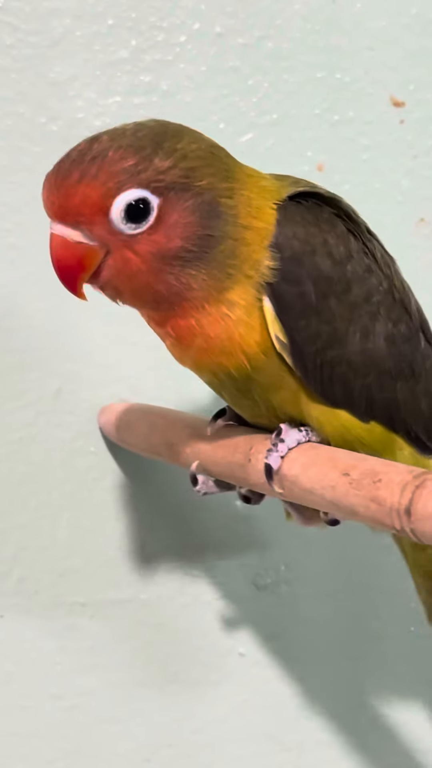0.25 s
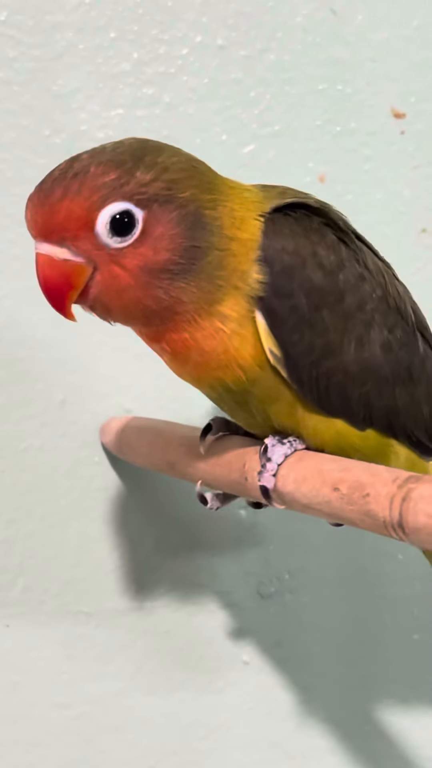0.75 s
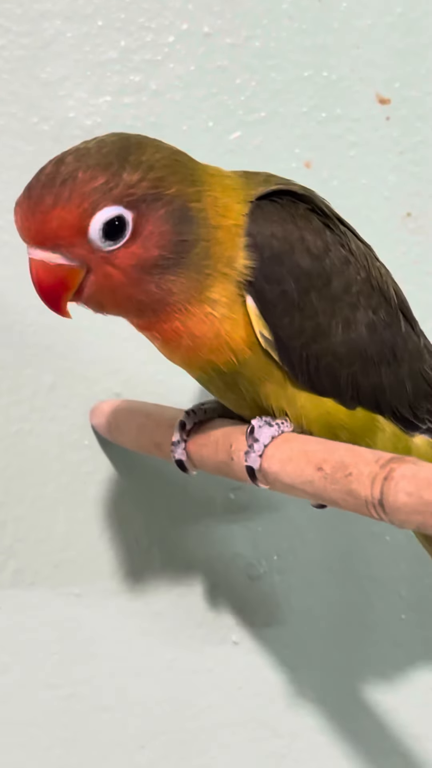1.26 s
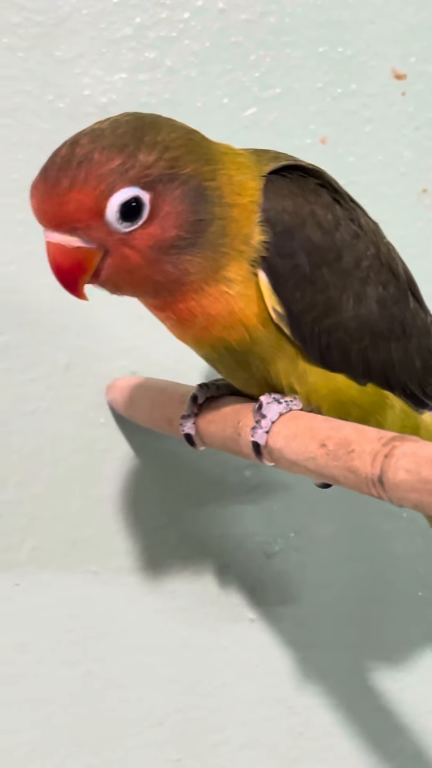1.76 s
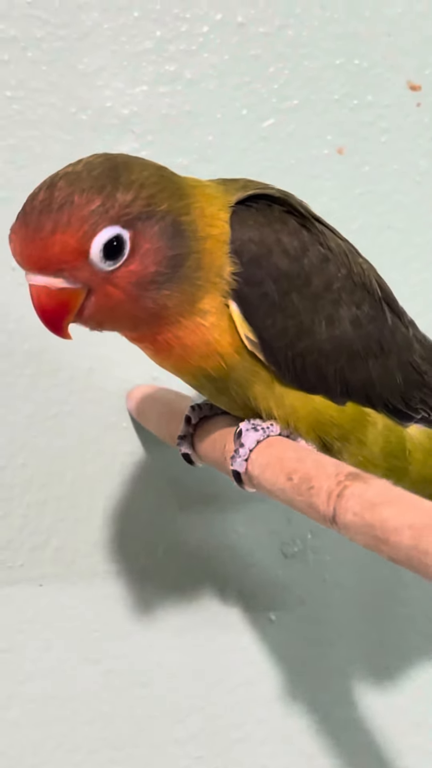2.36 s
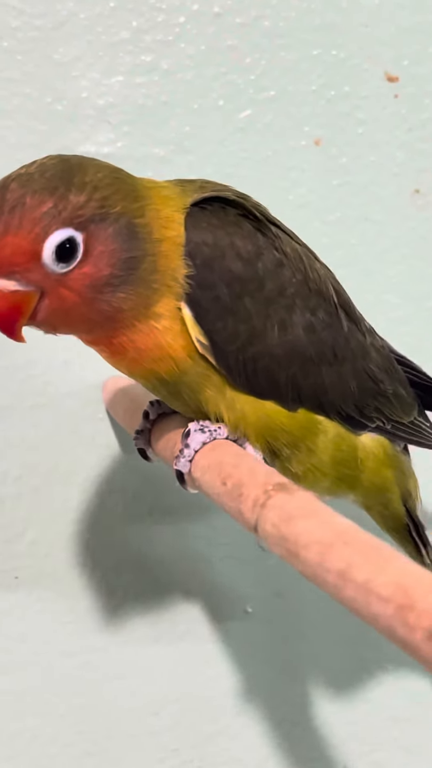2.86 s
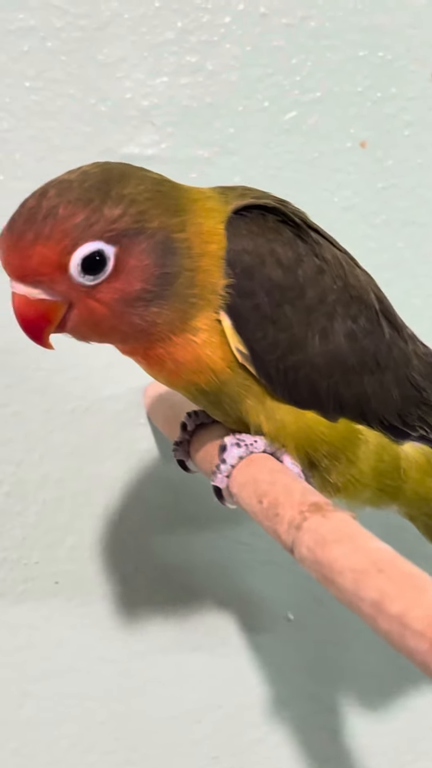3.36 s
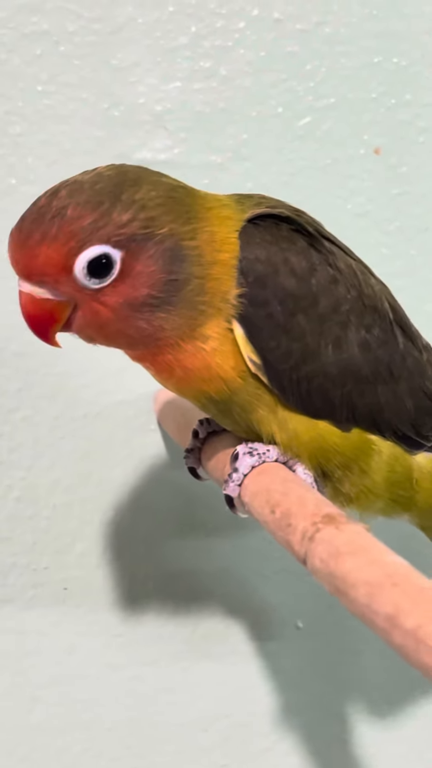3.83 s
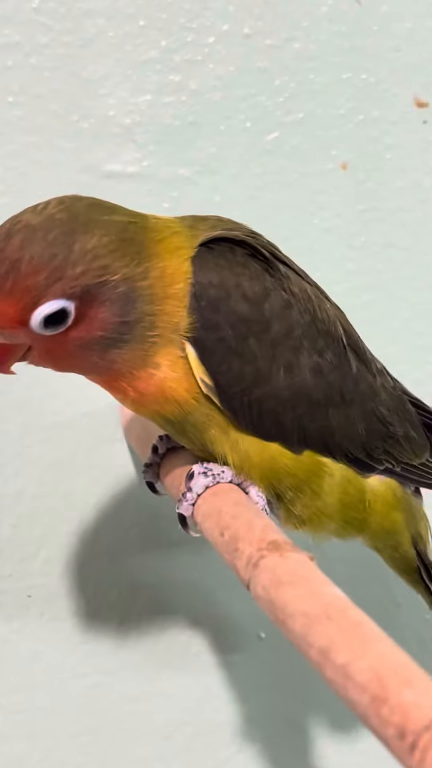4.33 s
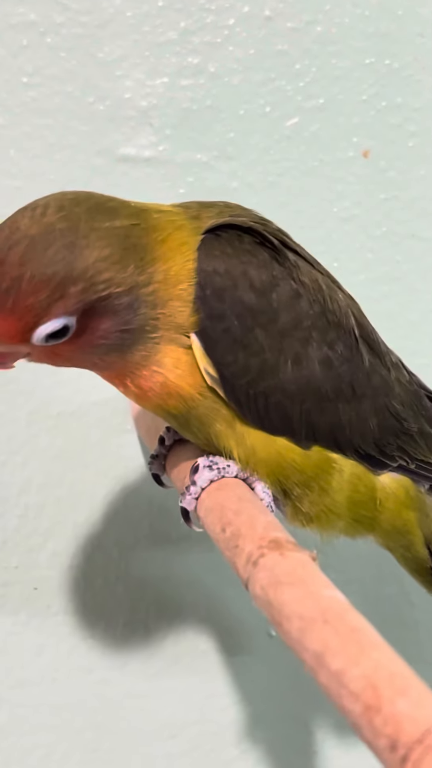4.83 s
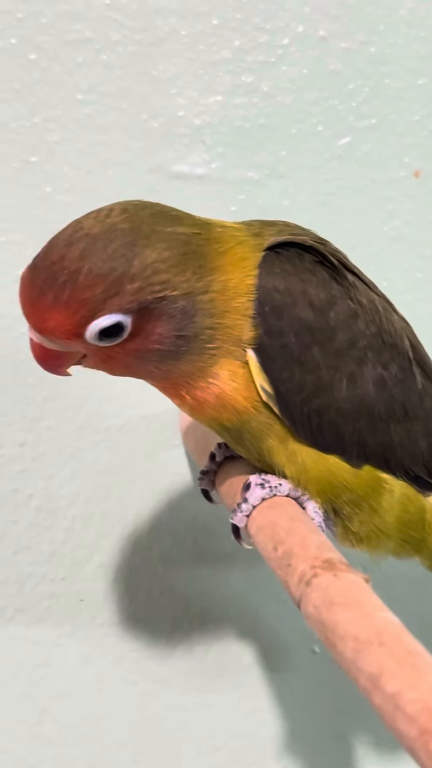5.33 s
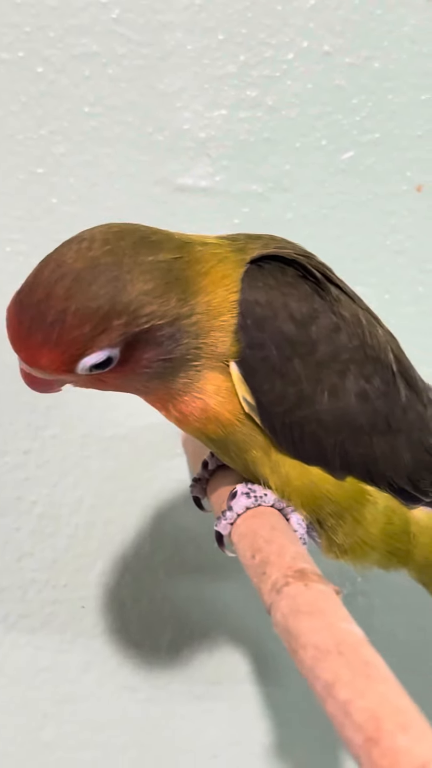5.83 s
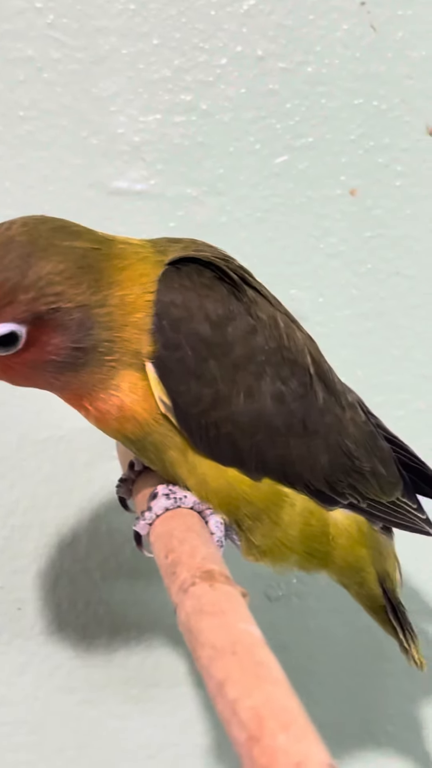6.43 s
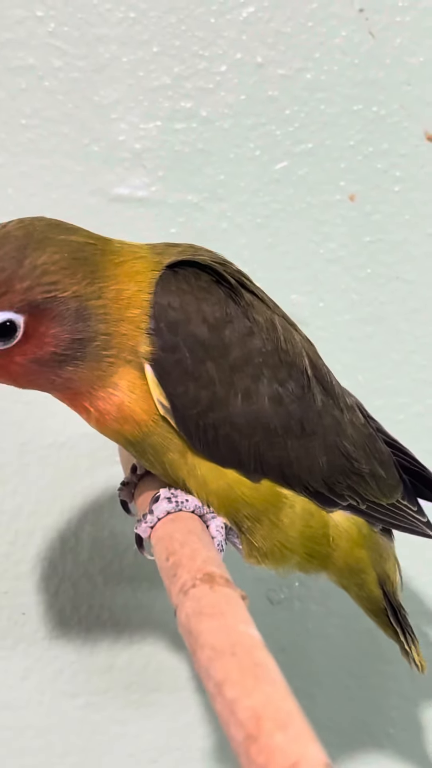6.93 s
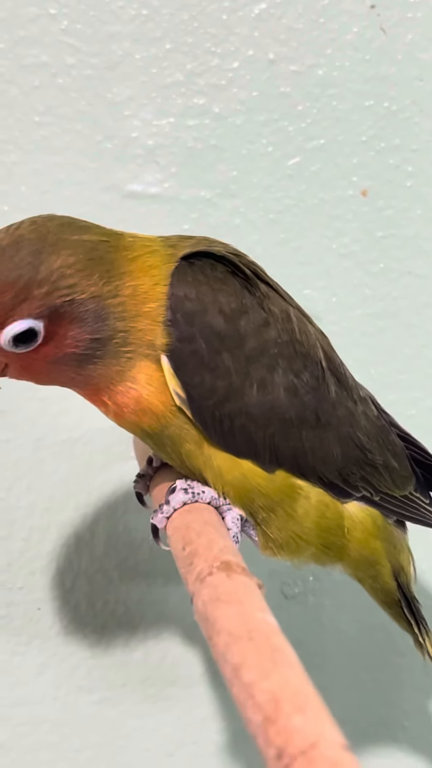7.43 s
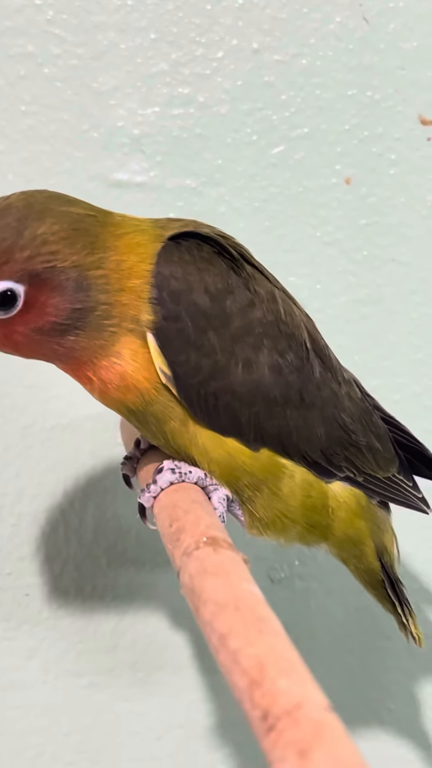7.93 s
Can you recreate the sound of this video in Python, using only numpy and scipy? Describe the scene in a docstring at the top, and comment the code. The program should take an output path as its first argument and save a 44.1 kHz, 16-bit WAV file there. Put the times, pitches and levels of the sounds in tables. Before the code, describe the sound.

A small parrot gives short, sharp, high chirps and scratchy chips close by in a bare, echoing room, with very faint street rumble behind.

```python
"""A small parrot calls close by in a bare, hard-walled room, heard in stereo.
Rough chips: a falling low buzz, a break and a whistle near 6 kHz. Clearer chirps: scrape, rising sweep, whistle.
Each note is a gliding sum of partials; roughness shakes pitch and level and adds air noise.
Behind: street rumble and wash, flickering treble hiss (shaped noise), a far engine that climbs in pitch
(two unsteady sines), a faint hum that stops early (sine over drone), dull taps and one slow, broad wash
of noise at 2.5 s, each a dying noise band."""
import sys
import numpy as np
from scipy import signal
from scipy.fft import rfft, irfft
from scipy.io import wavfile

SR = 44100
rng = np.random.default_rng(int(sys.argv[2]) if len(sys.argv) > 2 else 0)


def dump(signal):
    """Clip the signal to [-1, 1] and save it as 16-bit WAV at the path in sys.argv[1]."""
    limited = np.clip(np.atleast_2d(signal).T, -1, 1)
    pcm = np.round(limited * 32767).astype(np.int16)
    wavfile.write(sys.argv[1], SR, pcm)


N = 360738
HZ = np.fft.rfftfreq(N, 1 / SR)


def from_db(db):
    """dB to gain."""
    return 10 ** (np.asarray(db) / 20)


def rms_one(x):
    """Scale to rms 1."""
    return x / np.sqrt(np.mean(x ** 2) + 1e-20)


def in_time(rows):
    """Interpolate each column of a time table at every sample."""
    time_s, *columns = np.transpose(rows)
    return [np.interp(np.arange(N) / SR, time_s, column) for column in columns]


def colour(x, spectrum):
    """Filter by (freq_hz, gain_db) points on a log-frequency axis."""
    freq_hz, gain_db = np.transpose(spectrum)
    curve_db = np.interp(np.log(HZ + 1), np.log(freq_hz), gain_db)
    return irfft(rfft(x) * from_db(curve_db), N)


def wobble(rate_hz):
    """Random drift of rms 1: white noise through a two-pole low-pass."""
    pole = np.exp(-2 * np.pi * rate_hz / SR)
    white = rng.standard_normal(N + SR)
    settled = signal.lfilter([1], [1, -2 * pole, pole * pole], white)[SR:]
    return rms_one(settled)


def noise(spectrum, patchy_db):
    """Coloured noise of rms 1 with a slowly flickering level."""
    coloured = colour(rng.standard_normal(N), spectrum)
    return rms_one(coloured * from_db(patchy_db * wobble(7.7)))


def band_noise(white, edges_hz):
    """Band-passed noise."""
    return signal.sosfilt(signal.butter(2, edges_hz, "band", fs=SR, output="sos"), white)


# low street noise: freq_hz, relative_density_db
RUMBLE_SPECTRUM = [(12, -48.5), (20, -29.5), (59, -4.5), (108, 0.5), (141, -14), (171, -4.5), (203, -33.5),
                   (230, -23), (300, -56.5), (510, -120)]
# its level: time_s, level_db
RUMBLE_LEVEL = [(0, -65), (.45, -66.5), (.8, -61), (1.25, -59.5), (1.6, -67.5), (2.0, -64), (3.0, -61),
                (3.7, -68), (4.3, -60.5), (4.8, -66), (5.8, -63), (6.4, -63), (7.0, -66), (7.8, -63),
                (8.18, -69.5)]
# mid street noise: freq_hz, relative_density_db
WASH_SPECTRUM = [(120, -25), (200, -6), (329, -16.5), (461, -13.5), (564, -20.5), (929, -11.5), (1610, -24),
                 (3430, -42), (5000, -39.5), (6500, -75), (11000, -120)]
# its level: time_s, level_db
WASH_LEVEL = [(0.0, -79), (1.23, -73), (1.48, -82), (2.8, -70.5), (3.8, -87.5), (4.6, -82), (4.74, -75.5),
              (5.49, -79.5), (6.49, -75), (7.34, -82), (7.61, -75), (8.18, -81)]


def street():
    """Low rumble plus mid wash: shaped noise on drifting levels."""
    (rumble_db,), (wash_db,) = in_time(RUMBLE_LEVEL), in_time(WASH_LEVEL)
    rumble = from_db(rumble_db) * noise(RUMBLE_SPECTRUM, patchy_db=1.5)
    wash = from_db(wash_db) * noise(WASH_SPECTRUM, patchy_db=3.)
    return rumble + wash


# noise that differs between left and right: freq_hz, relative_density_db
OWN_SPECTRUM = [(150, -42), (300, -6.5), (700, -5.5), (1400, -18.5), (3400, -27), (5000, -46)]
OWN_RE_WASH_DB = -1.5


def own_noise():
    """Independent noise at left and right; its level follows the wash."""
    (wash_db,) = in_time(WASH_LEVEL)
    pair = np.array([noise(OWN_SPECTRUM, patchy_db=9.0) for side in "LR"])
    return from_db(wash_db + OWN_RE_WASH_DB) * pair


# treble hiss: freq_hz, relative_density_db
HISS_SPECTRUM = [(1500, -19.5), (3000, -5), (5000, -10.5), (8000, -6), (10500, -7), (11300, -2),
                 (12000, -8.5), (15000, -16)]
# its level: time_s, level_db
HISS_LEVEL = [(0, -80), (1.2, -78.5), (1.8, -89), (4.5, -91.5), (5.1, -72.5), (6.3, -73.5), (6.7, -97),
              (7.25, -72.5), (7.5, -84.5), (8.18, -83)]


def hiss():
    """Thin treble noise that comes and goes."""
    (level_db,) = in_time(HISS_LEVEL)
    return from_db(level_db) * noise(HISS_SPECTRUM, patchy_db=2.0)


# far engine: time_s, firing_hz, level_db (mean, about which the level wobbles)
ENGINE_RUN = [(1.6, 117, -89), (1.78, 124.7, -57), (2.05, 130, -64), (2.5, 135, -64), (2.7, 150, -66.5),
              (3.22, 149.7, -56.5), (3.4, 155.7, -72.5), (3.48, 163, -60), (3.78, 163.4, -59.5),
              (4.1, 158.5, -79)]
HALF_DB, HALF_MIDDLE_S, HALF_WIDTH_S = -57, 2.9, .2   # half-rate swell: peak, middle, half width at 1/e


def engine():
    """Firing tone of unsteady pitch and level, plus a half-rate tone that swells once."""
    firing_hz, level_db = in_time(ENGINE_RUN)
    t = np.arange(N) / SR
    start_s, end_s = ENGINE_RUN[0][0], ENGINE_RUN[-1][0]
    fade = np.clip(np.minimum(t - start_s, end_s - t) / .15, 0, 1)
    phase = 2 * np.pi * np.cumsum(firing_hz * (1 + 0.0021 * wobble(19))) / SR
    firing = from_db(level_db + 5.8 * wobble(9)) * np.sin(phase)
    swell = np.exp(-((t - HALF_MIDDLE_S) / HALF_WIDTH_S) ** 2)
    half = from_db(HALF_DB) * swell * np.sin(phase / 2)
    return np.sqrt(2) * fade * (firing + half)   # sqrt(2): levels are rms


# appliance drone: freq_hz, relative_density_db
DRONE_SPECTRUM = [(150, -30.5), (210, 2.5), (300, 1.5), (400, -29.5)]
DRONE_DB = -76.5
HUM_HZ, HUM_WOBBLE_HZ, HUM_DB = 466, 17, -78   # HUM_DB: sine peak at wobble 1
HUM_END_S = 3.3


def hum():
    """Some appliance that switches off: a sine of random amplitude over a low noise drone."""
    t = np.arange(N) / SR
    on = np.clip((HUM_END_S - t) / .05, 0, 1)
    tone = from_db(HUM_DB) * wobble(HUM_WOBBLE_HZ) * np.sin(2 * np.pi * HUM_HZ * t)
    drone = from_db(DRONE_DB) * noise(DRONE_SPECTRUM, patchy_db=2.5)
    return on * (tone + drone)


# dull taps and one slow, broad wash of noise at 2.5 s:
# start_s, level_db (before decay), centre_hz, width_hz, t60_s
NOISE_BURSTS = [(2.253, -51.5, 652, 495, 0.021), (2.519, -75.5, 1800, 2556, 1.28),
                (2.71, -62.5, 502, 497, 0.045), (2.827, -64, 303, 388, 0.066), (3.08, -81, 496, 593, 0.043),
                (4.28, -68, 280, 202, 0.17), (4.92, -65.5, 610, 500, 0.16), (4.773, -50.5, 470, 123, 0.27),
                (4.773, -56, 1094, 237, 0.37), (6.342, -57.5, 1677, 925, 0.25),
                (6.518, -61, 1650, 924, 0.29), (7.049, -54, 1440, 593, 0.23),
                (7.356, -60.5, 1700, 1524, 0.76), (7.721, -58, 1440, 600, 0.25)]


def taps_and_wash():
    """Dull taps and one slow, broad wash of noise at 2.5 s, each a dying noise band."""
    out, white = np.zeros(N), rng.standard_normal(N)
    for start_s, level_db, centre_hz, width_hz, t60_s in NOISE_BURSTS:
        i = round(start_s * SR)
        t = np.arange(min(N - i, round(t60_s * SR))) / SR
        middle_hz = np.sqrt(centre_hz ** 2 + width_hz ** 2 / 4)   # makes centre_hz the geometric mean
        edges_hz = middle_hz + np.array([-.5, .5]) * width_hz
        band = band_noise(white[i:i + len(t)], edges_hz)
        out[i:i + len(t)] += rms_one(band) * from_db(level_db - 60 * t / t60_s)
    return out


# reverberation: freq_hz, t60_s
ROOM_DECAY = [(1500, 0.23), (3000, 0.22), (6200, 0.21), (9000, 0.09), (13000, 0.22)]
REFLECTION_RAMP_S = 0.0042


def room(x):
    """Dense reflections: noise bands decaying at pitch-dependent rates, scaled to unit energy."""
    t = np.arange(SR // 2) / SR
    edges_hz, tail = 900 * 2 ** np.arange(0, 4.3, .5), 0
    freq_hz, t60_s = np.transpose(ROOM_DECAY)
    for low_hz, high_hz in zip(edges_hz, edges_hz[1:]):
        band = band_noise(rng.standard_normal(len(t)), [low_hz, high_hz])
        band_t60_s = np.interp(np.sqrt(low_hz * high_hz), freq_hz, t60_s)
        tail = tail + band * from_db(-60 * t / band_t60_s)
    tail = tail * np.clip(t / REFLECTION_RAMP_S, 0, 1)   # reflections thicken
    return signal.fftconvolve(x, tail / np.sqrt(np.sum(tail ** 2)))[:N]


# phase between left and right: freq_hz, left_lead_rad
STEREO_PHASE = [(0, 0), (250, -.1), (770, -1.9), (1110, -1.6), (1630, 0), (2400, .5), (3800, .6),
                (4470, 1.5), (5160, 4.9), (5510, 6.0), (8610, 9.3), (9300, 9.5), (12400, 12.6),
                (13800, 12.6), (14800, 15.7)]


def stereo(x):
    """A fixed filter turns the phase between left and right by a pitch-dependent angle."""
    freq_hz, lead_rad = np.transpose(STEREO_PHASE)
    turn = np.exp(.5j * np.interp(HZ, freq_hz, lead_rad))
    left = irfft(rfft(x) * turn, N)
    right = irfft(rfft(x) / turn, N)
    return np.array([left, right])


def overtones(slope_db, rough):
    """Low register: seven harmonics on a dB slope; roughness leaves their gains alone."""
    return [(k + 1, from_db(slope_db * k)) for k in range(7)]


# gains at full roughness of partials 1/3, 2/3, 4/3, 5/3 of the whistle pitch: gain_db
UNDERTONE_GAINS = (-33, -12, -5.5, -1)


def whistle(octave_db, rough):
    """High register: pitch and octave; when rough, every third cycle differs, adding undertones."""
    thirds = [(k / 3, rough ** 2 * from_db(db)) for k, db in zip((1, 2, 4, 5), UNDERTONE_GAINS)]
    return [(1, 0.56), (2, from_db(octave_db))] + thirds


# air rushing past the membranes: freq_hz, relative_density_db
AIR_SPECTRUM = [(1500, -32), (2100, 12), (3500, 16.5), (6000, -3), (9000, -6.5), (12000, -18)]
BREATH_DB = -1.5   # re note level, at roughness 1


def notes(table, partials, rise_s, fall_s, swell_db, bend, scoop, crack, waver, flutter_db):
    """Gliding notes; roughness shakes pitch and level within a few cycles and lets air hiss through."""
    out, shake, flutter = np.zeros(N), wobble(510), wobble(680)
    air = noise(AIR_SPECTRUM, patchy_db=6.6)
    for start_s, length_s, start_hz, end_hz, level_db, rough, shape_db in table:
        at = slice(round(start_s * SR), round((start_s + length_s) * SR))
        t = np.arange(at.stop - at.start) / SR
        rough = np.clip(rough, 0, 1)
        unsteady = rough ** 1.5 + crack * np.exp(-t / .002)   # membranes take a moment to lock in
        glide_hz = start_hz + (end_hz - start_hz) * (t / length_s) ** bend
        glide_hz = glide_hz * (1 - scoop * np.exp(-t / 0.002))   # scoops up from below
        phase = 2 * np.pi * np.cumsum(glide_hz * (1 + waver * unsteady * shake[at])) / SR
        tone = sum(gain * np.sin(k * phase) * (k * glide_hz < .42 * SR)
                   for k, gain in partials(shape_db, rough))
        envelope = np.minimum(t / rise_s, 1) * np.minimum((length_s - t) / fall_s, 1)
        effort_db = level_db + swell_db * (t / length_s - 1)
        effort_db = effort_db + flutter_db * np.sqrt(rough) * np.tanh(flutter[at])
        breath = from_db(BREATH_DB) * rough ** 3 * air[at]
        out[at] += from_db(effort_db) * envelope * (tone + breath)
    return out


# rough chips, levels before swell and tract, pitches before scoop and shake: start_s, buzz_hz, buzz_db,
# break_hz, break_db, whistle_delay_s, whistle_length_s, whistle_start_hz, whistle_db, whistle_rough (0-1)
CHIP_CALLS = [(0.531, 3085, -34, 5330, -21.5, 0.023, 0.035, 5860, -29, .4),
              (0.852, 3048, -36, 5460, -40, 0.015, 0.016, 5840, -29.5, 0.26),
              (0.969, 3300, -32, 5380, -23.5, 0.021, 0.016, 6015, -20.5, 0.33),
              (1.506, 4000, -35.5, 5200, -27.5, .016, .03, 6186, -28.5, 0.29),
              (1.777, 3268, -29.5, 5005, -19, 0.024, 0.017, 6240, -20, 0.39),
              (2.109, 3390, -30, 5320, -19.5, 0.024, 0.018, 6437, -21.5, 0.41),
              (3.371, 3650, -36.5, 6567, -36.5, 0.014, 0.033, 6010, -35.5, 0.41),
              (3.451, 3725, -35.5, 5220, -32.5, 0.012, 0.021, 6076, -28, 0.51),
              (3.944, 3009, -35.5, 4900, -23.5, .017, 0.026, 5960, -27, 0.38),
              (4.551, 3286, -29.5, 4990, -23, 0.025, 0.02, 6160, -21, 0.25),
              (4.863, 3340, -31.5, 5060, -28, 0.02, 0.022, 6414, -21, 0.31),
              (5.219, 2930, -32, 5150, -25.5, 0.013, 0.03, 6250, -23, 0.38),
              (5.542, 3415, -31.5, 5420, -55, 0.017, 0.027, 6000, -29, .3),
              (5.916, 3140, -31, 5246, -22.5, .022, 0.02, 6316, -24.5, 0.34),
              (6.398, 3040, -30.5, 5200, -19, 0.032, 0.022, 6255, -29.5, 0.45),
              (6.813, 3413, -30, 5290, -19.5, .023, 0.016, 6095, -20, 0.39),
              (7.409, 3367, -31, 5190, -30, .016, 0.018, 5870, -20.5, 0.38),
              (7.578, 3823, -33.5, 5180, -39, .015, 0.02, 6076, -23.5, 0.39),
              (7.945, 2796, -24.5, 5400, -33.5, 0.015, 0.037, 6150, -20, 0.18)]
BUZZ_S, BUZZ_FALL, BUZZ_SLOPE_DB = .014, .85, 0.88   # length, end/start pitch, dB per overtone
BREAK_AT, BREAK_S, BREAK_OCTAVE_DB = .62, 0.011, -3   # start as share of whistle delay, length, octave
CHIP_RISE, CHIP_OCTAVE_DB = 1.035, -12.5   # whistle end/start pitch, octave
BUZZ_ROUGH, BREAK_ROUGH = .72, .36   # 0-1


def chips():
    """Chips as rows for notes(): a buzz in the low register, a break and a whistle in the high one."""
    low, high = [], []
    for (start_s, buzz_hz, buzz_db, break_hz, break_db,
         delay_s, length_s, whistle_hz, whistle_db, rough) in CHIP_CALLS:
        low.append((start_s, BUZZ_S, buzz_hz, BUZZ_FALL * buzz_hz, buzz_db, BUZZ_ROUGH, BUZZ_SLOPE_DB))
        break_s = start_s + BREAK_AT * delay_s
        high.append((break_s, BREAK_S, break_hz, break_hz, break_db, BREAK_ROUGH, BREAK_OCTAVE_DB))
        high.append((start_s + delay_s, length_s, whistle_hz, CHIP_RISE * whistle_hz,
                     whistle_db, rough, CHIP_OCTAVE_DB))
    return low, high


# clear chirps, same conventions: start_s, sweep_length_s, sweep_start_hz, sweep_end_hz, sweep_db,
# whistle_length_s, whistle_start_hz, whistle_end_hz, whistle_db, whistle_rough (0-1), octave_db
CHIRP_CALLS = [(.047, .011, 1911, 2113, -30.5, .058, 5480, 6286, -21.5, 0.4, -4),
               (1.192, .04, 2222, 2466, -29.5, 0.016, 6122, 6465, -10.5, 0.2, -7),
               (1.382, .033, 2064, 2349, -34, 0.037, 6035, 6374, -21.5, .15, -5),
               (3.212, 0.039, 1820, 2358, -30.5, .013, 6130, 6016, -10, 0.05, -9.5),
               (4.663, .031, 2129, 2385, -29, 0.057, 6002, 6300, -18.5, .14, -4.5),
               (5.362, 0.0075, 1864, 2154, -27.5, .043, 5654, 6123, -16, 0.05, -7.5),
               (6.631, .039, 1933, 2208, -32, 0.026, 5630, 6160, -17.5, 0.16, -1),
               (7.957, .036, 1802, 2259, -33, 0.04, 5883, 6030, -21, 0.17, -6)]
SWEEP_SLOPE_DB, SWEEP_ROUGH = 2.76, .07   # dB per overtone, 0-1
FLIP_S = .003   # gap before whistle
SCRAPE_S, SCRAPE_HZ, SCRAPE_RE_SWEEP_DB = 0.006, 3370, -7   # opening buzz


def chirps():
    """Chirps as rows for notes(): brief scrape and low sweep together, then the flip up to the whistle."""
    scrape, low, high = [], [], []
    for (start_s, sweep_s, sweep_hz0, sweep_hz1, sweep_db,
         length_s, whistle_hz0, whistle_hz1, whistle_db, rough, octave_db) in CHIRP_CALLS:
        scrape.append((start_s, SCRAPE_S, SCRAPE_HZ, BUZZ_FALL * SCRAPE_HZ,
                       sweep_db + SCRAPE_RE_SWEEP_DB, BUZZ_ROUGH, BUZZ_SLOPE_DB))
        low.append((start_s, sweep_s, sweep_hz0, sweep_hz1, sweep_db, SWEEP_ROUGH, SWEEP_SLOPE_DB))
        high.append((start_s + sweep_s + FLIP_S, length_s, whistle_hz0, whistle_hz1,
                     whistle_db, rough, octave_db))
    return scrape, low, high


# windpipe, beak and microphone together: freq_hz, gain_db
TRACT_RESPONSE = [(700, -36), (1200, -16.5), (1750, -10.5), (2100, 0), (3200, -4), (4500, 5), (6200, 1),
                  (7600, 0.5), (9000, 2.5), (11000, 1), (12700, -13.5), (13600, -31.5), (15000, -34)]


def parrot():
    """Both registers of the membranes through the windpipe and beak."""
    buzzes, chip_tops = chips()
    scrapes, sweeps, chirp_tops = chirps()
    buzz = notes(buzzes + scrapes, overtones, rise_s=.0055, fall_s=.0025, swell_db=8.0,
                 bend=0.56, scoop=.14, crack=0.52, waver=.16, flutter_db=6.)
    sweep = notes(sweeps, overtones, rise_s=.006, fall_s=.004, swell_db=7.0,
                  bend=.9, scoop=.11, crack=0.2, waver=.16, flutter_db=6.)
    high = notes(chip_tops + chirp_tops, whistle, rise_s=.0035, fall_s=0.011, swell_db=-7.5,
                 bend=.45, scoop=0.018, crack=0.097, waver=0.18, flutter_db=7.0)
    return colour(buzz + sweep + high, TRACT_RESPONSE)


ROOM_DB, APART_DB = 3, -22   # re direct bird: main reverberation, opposite-sign reverberation


def scene():
    """Bird in the room, the rest behind, in stereo."""
    bird = parrot()
    behind = street() + hiss() + engine() + hum() + taps_and_wash()
    common = bird + from_db(ROOM_DB) * room(bird) + behind
    # a second, faint reverberation, opposite in sign at left and right, widens the room
    apart = from_db(APART_DB) * room(bird) * [[1], [-1]]
    return stereo(common) + own_noise() + apart


CUTOFF_HZ = 15700   # 70 dB down from here up


def record(dry):
    """Steep low-pass: the top is cut."""
    return signal.sosfilt(signal.cheby2(12, 70, CUTOFF_HZ, fs=SR, output="sos"), dry)


dry = scene()
out = record(dry)
dump(out)
```